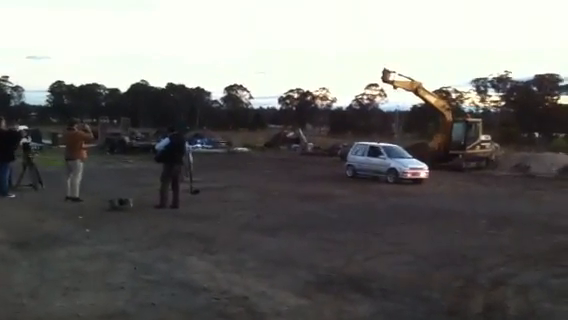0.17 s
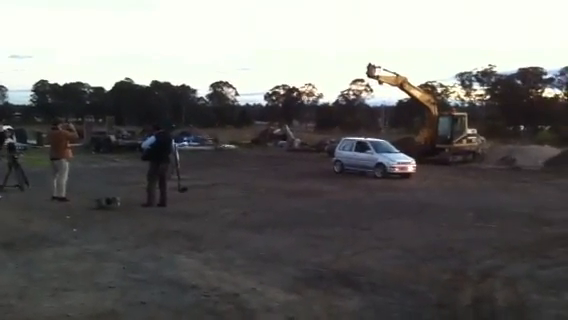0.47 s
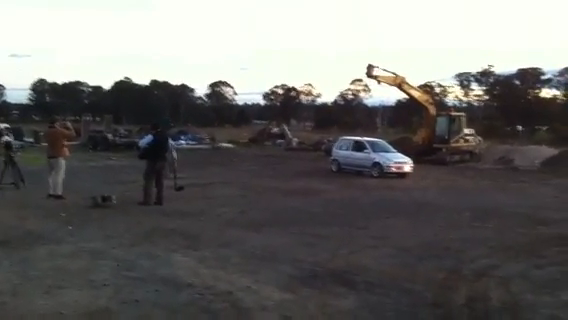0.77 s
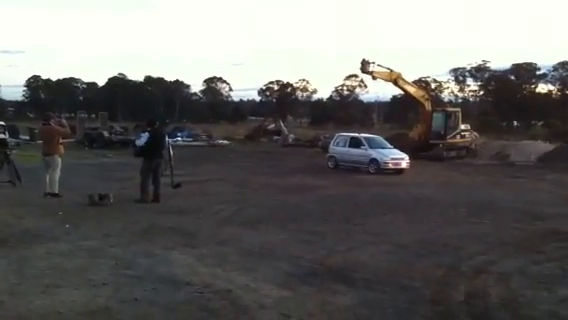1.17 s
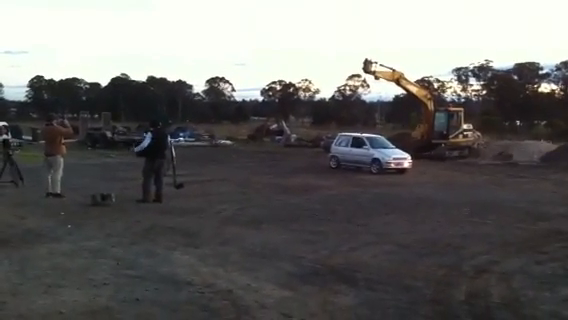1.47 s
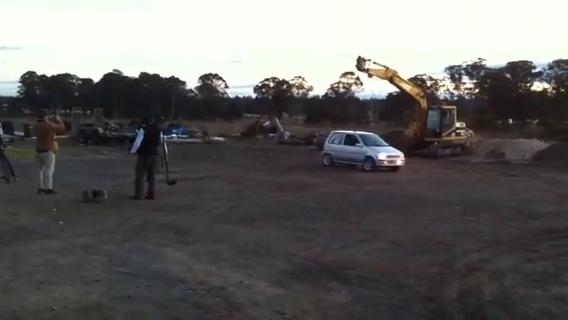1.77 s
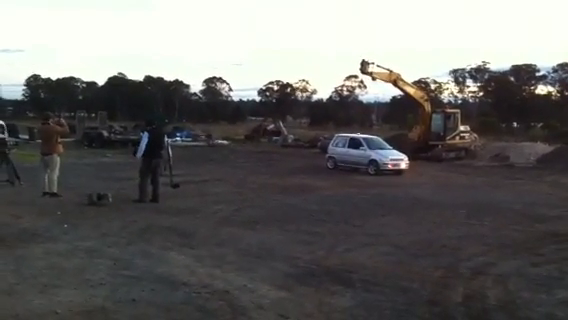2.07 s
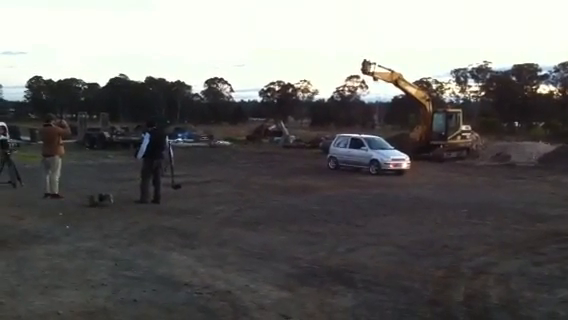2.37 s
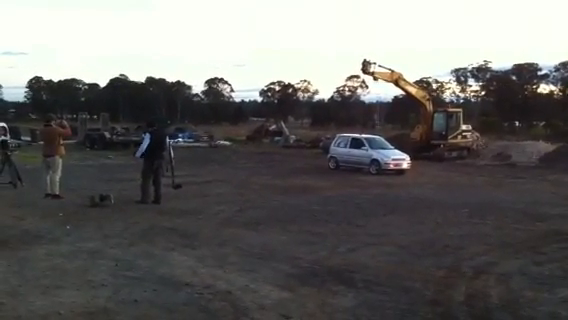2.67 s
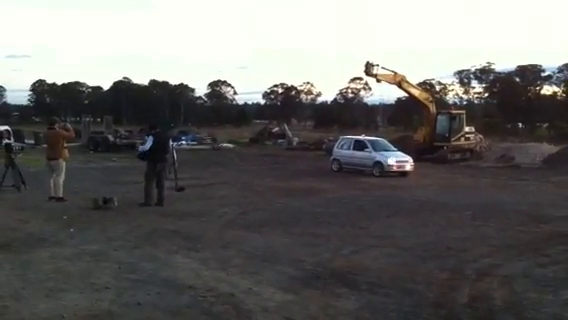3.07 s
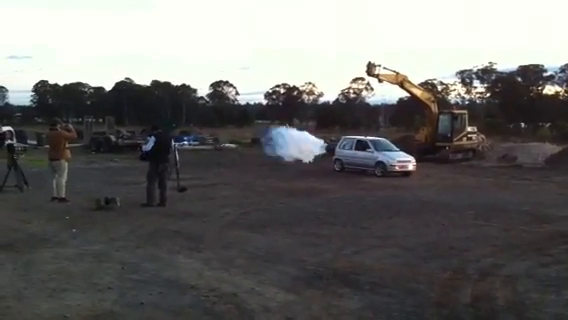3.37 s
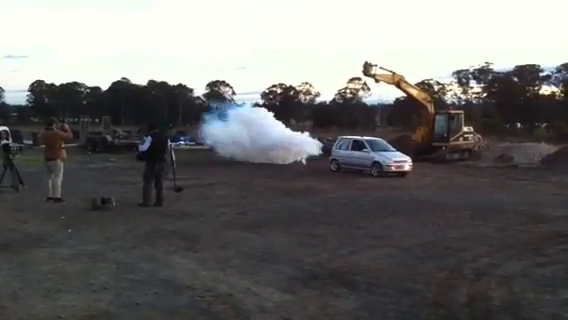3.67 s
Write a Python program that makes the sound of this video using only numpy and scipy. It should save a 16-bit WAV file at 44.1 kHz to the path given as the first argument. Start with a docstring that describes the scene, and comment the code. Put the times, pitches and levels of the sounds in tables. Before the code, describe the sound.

A jet turbine in a small car sings one piercing high tone, around 2.1 kHz, rising very slightly throughout nearly four seconds. It is strong at first, weakens from about 1.1 seconds, breaks into deep ragged fades between 1.5 and 2.1, then returns strongly by 2.9. Faint fluttering overtones, low exhaust roar and intake hiss continue underneath. Distant, open-air, mono small-microphone sound with dulled top.

```python
"""The piercing whine of a jet turbine in a small car, some way off on an open lot, slowly gaining speed.
Its compressor blades sing one tone with faint overtones, made from a turning wave and its multiples.
Each tone swells, fades and flutters on its way through the moving air.
Under it lie the low roar of the exhaust and the hiss of the intake, both made from coloured noise."""
import sys
import numpy as np
from scipy import signal
from scipy.fft import rfft, irfft
from scipy.io import wavfile

SR = 44100
rng = np.random.default_rng(int(sys.argv[2]) if len(sys.argv) > 2 else 0)


def transcribe(u):
    """Save the signal u as a 16-bit wav file named by the first command-line argument.

    u: samples, shape (n,) or (channels, n), limited to [-1, 1]; the rate is SR.
    q: integer samples, one column per channel.
    """
    v = np.clip(np.atleast_2d(u).T, -1, 1)
    q = np.round(v * 32767).astype(np.int16)
    wavfile.write(sys.argv[1], SR, q)


N = 168462  # length of the sound in samples


def from_db(db):
    """Turn decibels into a gain."""
    return 10 ** (np.asarray(db) / 20)


def rms_one(x):
    """Scale a signal to an average power of 1."""
    return x / np.sqrt(np.mean(np.abs(x) ** 2) + 1e-20)


def in_time(rows, axis=1):
    """Join the points of one table column by straight lines; column 0 is the time in seconds."""
    columns = np.transpose(rows)
    return np.interp(np.arange(N) / SR, columns[0], columns[axis])


def drift(rate_hz):
    """Smooth chance motion of spread 1: noise with its changes faster than about rate_hz smoothed away."""
    step = 40  # samples between computed points; straight lines join them
    pole = np.exp(-2 * np.pi * rate_hz * step / SR)
    warm_up = 2000  # points dropped while the filter settles
    noise = rng.standard_normal(N // step + 2 + warm_up)
    slow = signal.lfilter([1], [1, -2 * pole, pole * pole], noise)[warm_up:]
    return np.interp(np.arange(N) / step, np.arange(len(slow)), rms_one(slow))


def scatter(spread_hz):
    """Random strength and phase of a tone that has come by many shifting paths."""
    return rms_one(drift(spread_hz) + 1j * drift(spread_hz))


def turbulence(spectrum, flicker_db):
    """Noise of the given colour, falling steeply past its ends; each octave flickers a little."""
    points_hz, colour_db = np.transpose(spectrum)
    hz = np.maximum(np.fft.rfftfreq(N, 1 / SR), 1)
    low_skirt = np.minimum(hz / points_hz[0], 1) ** 6
    high_skirt = np.minimum(points_hz[-1] / hz, 1) ** 6
    colour = from_db(np.interp(np.log(hz), np.log(points_hz), colour_db))
    noise = rfft(rng.standard_normal(N)) * low_skirt * high_skirt * colour

    octave = np.clip(np.log2(hz), 6, 14)
    together = drift(4)  # a motion that all octaves share
    out = 0
    for k in range(6, 15):  # overlapping bands centred on 2**k Hz
        band = irfft(noise * np.maximum(1 - np.abs(octave - k), 0), N)
        out = out + band * from_db(flicker_db * (together + drift(13)))
    return rms_one(out)


def intake():
    """Air rushing through the blades makes a hiss, strongest around the whine."""
    # colour of the hiss, only its shape matters: [f/Hz, level per Hz/dB]
    hiss_colour = [(1300, -22.5), (1550, -19), (1800, -8), (1970, -9), (2050, -2.5), (2250, -2.5),
                   (2310, -5), (2380, -5.5), (2550, -15.5), (2850, -17.5), (3200, -22), (3900, -20),
                   (4400, -20.5), (4700, -25.5), (5300, -22.5), (6000, -26), (7200, -24.5), (7900, -29.5),
                   (9000, -23.5), (10000, -30.5), (12500, -32), (14000, -28), (15200, -34)]
    # rise and fall of the hiss, before the lift: [t/s, level/dB]
    hiss_level = [(0.03, -39), (0.49, -42.5), (1.32, -39.5), (2.56, -38), (2.93, -39.5), (3.38, -39.5),
                  (3.62, -41), (3.78, -40)]
    lift_db = 13.5
    return from_db(lift_db + in_time(hiss_level)) * turbulence(hiss_colour, flicker_db=0.76)


def exhaust():
    """The jet leaving the turbine churns the air into a low roar."""
    # colour of the roar, only its shape matters: [f/Hz, level per Hz/dB]
    roar_colour = [(25, -40.5), (45, -38), (75, -21), (105, -9), (165, -1), (320, -1.6), (410, -9),
                   (470, -9.5), (525, -4.5), (565, -9.5), (625, -1.7), (725, -6), (780, -15.5), (960, -20),
                   (1150, -14.5), (1400, -20)]
    # rise and fall of the roar: [t/s, level/dB]
    roar_level = [(0.03, -31), (0.08, -31), (0.18, -35.5), (2.43, -29), (2.52, -31.5), (2.63, -28.5),
                  (2.94, -30), (2.97, -33), (3.18, -30.5), (3.28, -33), (3.3, -31), (3.78, -31.5)]
    return from_db(in_time(roar_level)) * turbulence(roar_colour, flicker_db=0.15)


def overtones(blades):
    """Faint multiples of the blade tone, each blurred by eddies (swirls of air) on the way."""
    # each overtone fades at its own moments, levels before the lift:
    # [t/s, level/dB of multiple 2, of 3, of 4, of 5, of 6, of 7]
    overtone_levels = [(0, -47, -52, -43, -61, -48, -55), (0.25, -46, -51.5, -51.5, -62, -52, -60),
                       (0.45, -48, -61, -50.5, -51, -57, -56), (0.7, -39.5, -60.5, -48.5, -66, -48, -54),
                       (0.9, -42.5, -56, -50, -62, -56, -59), (1.15, -38.5, -50, -44, -54, -48, -60),
                       (1.4, -35, -51, -42.5, -59, -50, -49), (1.6, -36, -46.5, -43, -66, -48, -53),
                       (1.85, -41, -51, -59, -69, -52, -55), (2.0, -45, -52, -54, -70, -56, -52),
                       (2.2, -38, -49, -44, -60, -53, -55), (2.45, -41.5, -53, -50, -62, -53, -55),
                       (2.7, -51, -53.5, -65, -66, -46, -50), (2.95, -42, -47.5, -54, -59, -47.5, -60),
                       (3.2, -35.5, -48, -52, -62, -49, -64), (3.45, -39.5, -45, -50, -63, -50, -61),
                       (3.75, -46.5, -53.5, -50, -67, -51, -61)]
    lift_db = 0.5
    # scattered parts, measured against the clean part of the same overtone
    flutter_db, flutter_hz = -9, 25.2  # slow
    rasp_db, rasp_hz = -10, 160  # fast
    out = 0
    for column in range(1, len(overtone_levels[0])):
        halo = from_db(flutter_db) * scatter(flutter_hz) + from_db(rasp_db) * scatter(rasp_hz)
        gain = from_db(lift_db + in_time(overtone_levels, axis=column))
        multiple = blades ** (column + 1)  # a power of a turning wave turns that many times faster
        out = out + gain * rms_one(1 + halo) * multiple
    return np.sqrt(2) * out.real


def blade_wave():
    """A complex wave that turns once each time a compressor blade passes."""
    # blade-passing rate, slowly climbing: [t/s, f/Hz]
    blade_rate = [(0, 2110), (0.5, 2118), (1.05, 2128), (1.4, 2135), (2.3, 2146.2), (3.0, 2153),
                  (3.82, 2161)]
    turns = np.cumsum(in_time(blade_rate)) / SR
    return np.exp(2j * np.pi * turns)


def whine(blades):
    """The blade tone: a clean direct part and a halo scattered by eddies that remains when it fades."""
    # level of the clean part, with a deep ragged fade in the middle: [t/s, level/dB]
    whine_level = [(0, -9.0), (0.05, -8), (0.52, -7.4), (0.62, -9.1), (0.85, -8), (1.15, -13),
                   (1.44, -13.5), (1.47, -15), (1.485, -29), (1.5, -16.1), (1.545, -20), (1.57, -38),
                   (1.79, -28), (1.8, -17.5), (1.817, -14.5), (1.825, -31), (1.87, -17.5), (1.91, -25),
                   (1.97, -18), (2.078, -13), (2.095, -21.3), (2.115, -15), (2.2, -18), (2.32, -11.5),
                   (2.42, -14), (2.445, -17), (2.48, -15.5), (2.65, -11.5), (2.88, -8.5), (3.02, -8),
                   (3.18, -12.5), (3.48, -8.5), (3.8, -8.5)]
    # scattered parts, before the strength share below
    flutter_db, flutter_hz = -29.5, 28.2  # slow
    rasp_db, rasp_hz = -28.5, 111  # fast
    strength_share = 0.83  # eddies shake the tone's strength less than its phase
    halo = from_db(flutter_db) * scatter(flutter_hz) + from_db(rasp_db) * scatter(rasp_hz)
    halo = strength_share * halo.real + 1j * halo.imag
    direct = from_db(in_time(whine_level))
    return np.sqrt(2) * ((direct + halo) * blades).real


def scene():
    """The turbine heard from one spot in the open: all its sounds added up."""
    blades = blade_wave()
    mix = intake() + exhaust() + overtones(blades) + whine(blades)
    return mix[None]  # one channel


def record(dry):
    """A small microphone with a narrow dip in the treble; the top is cut."""
    dip_hz, dip_width_hz = 11170, 1200
    cutoff_hz = 15500
    dip_edges = [dip_hz - dip_width_hz / 2, dip_hz + dip_width_hz / 2]
    dip = signal.butter(2, dip_edges, "bandstop", fs=SR, output="sos")
    top_cut = signal.ellip(10, 0.1, 90, cutoff_hz, fs=SR, output="sos")
    return signal.sosfilt(top_cut, signal.sosfilt(dip, dry))


dry = scene()
out = record(dry)
transcribe(out)
```